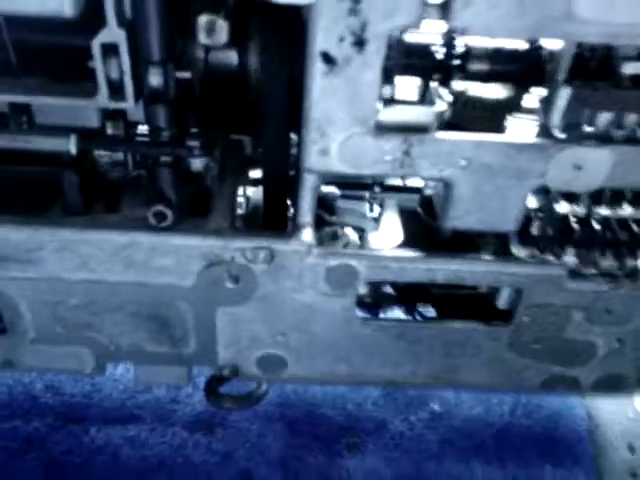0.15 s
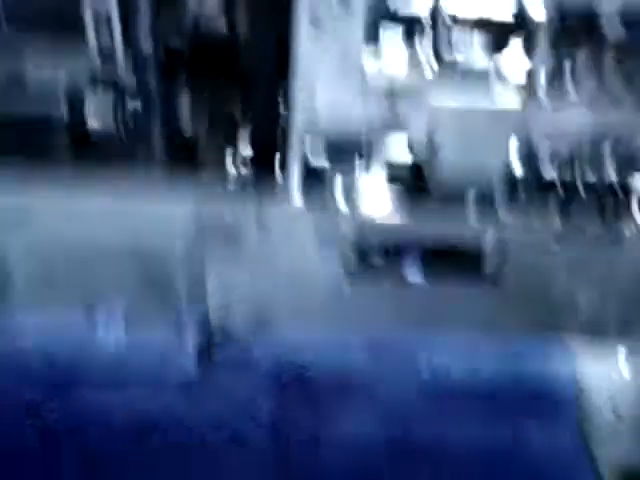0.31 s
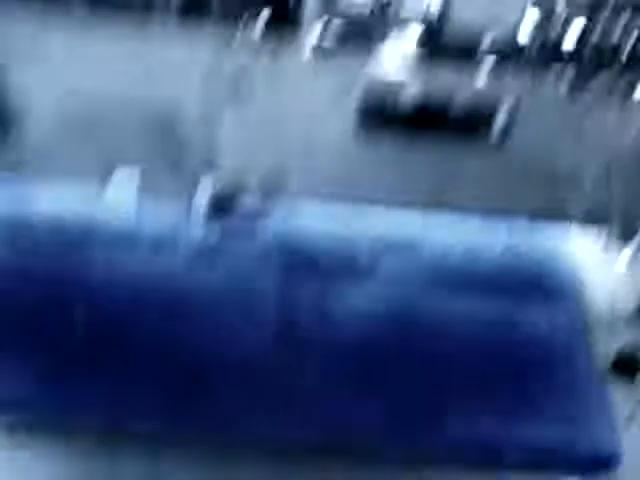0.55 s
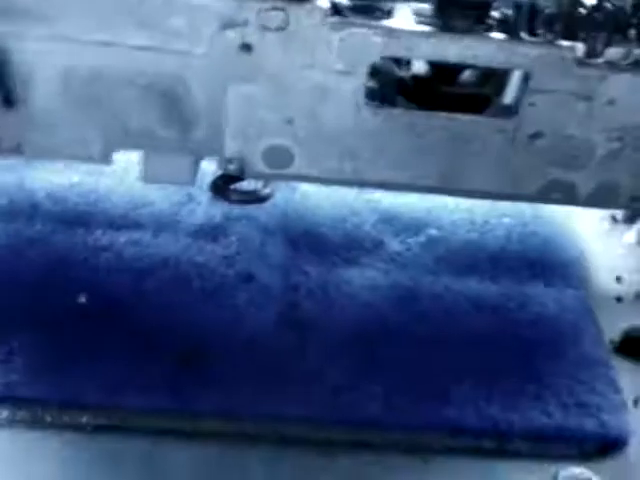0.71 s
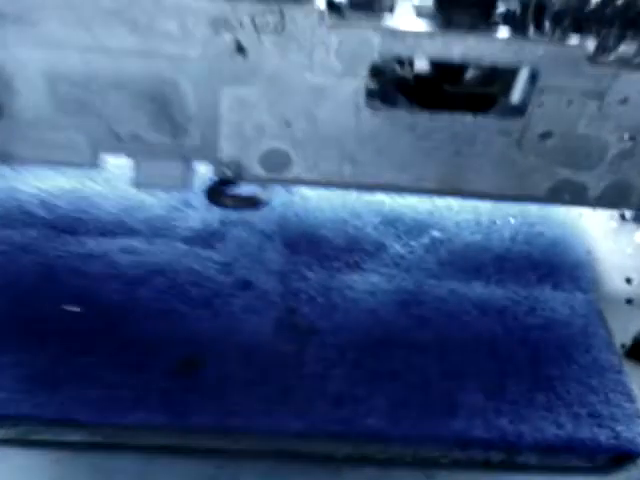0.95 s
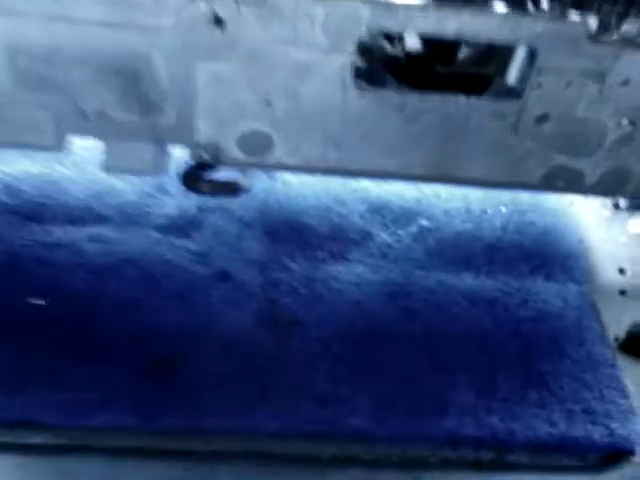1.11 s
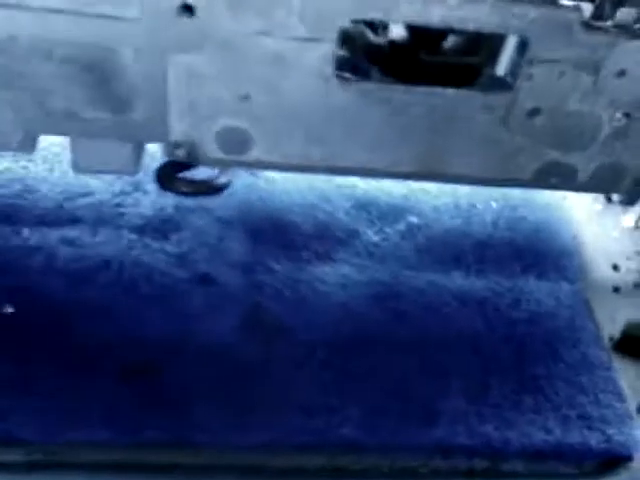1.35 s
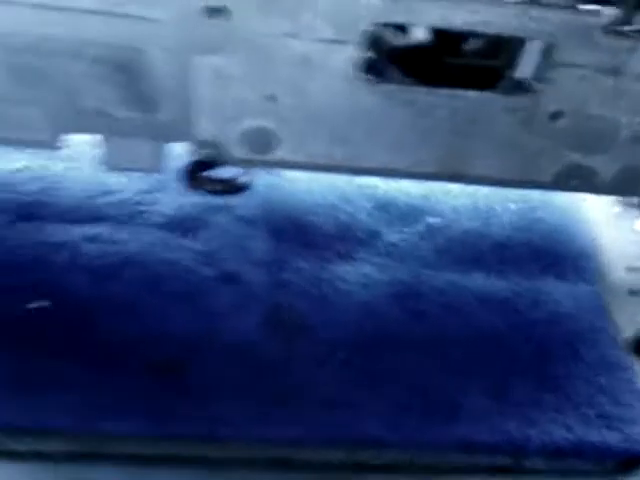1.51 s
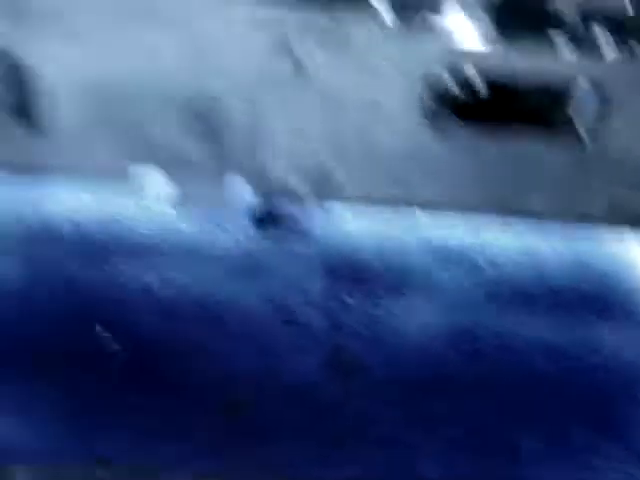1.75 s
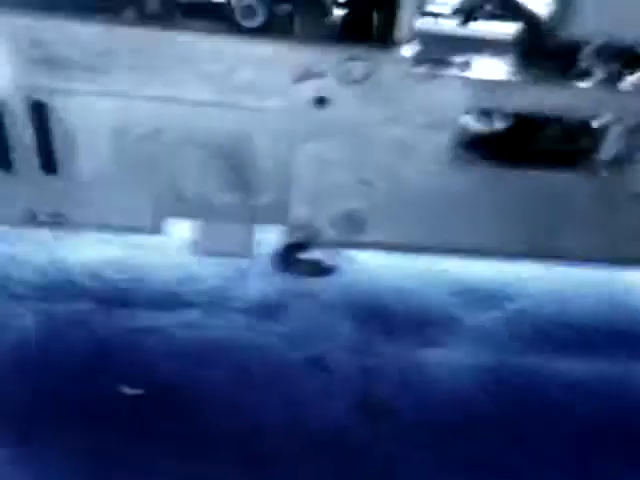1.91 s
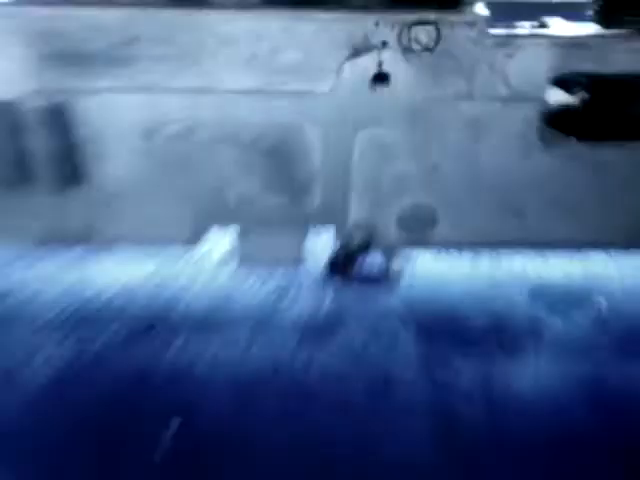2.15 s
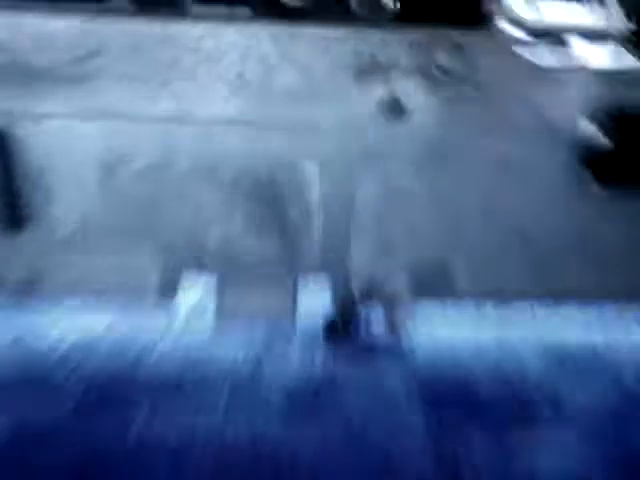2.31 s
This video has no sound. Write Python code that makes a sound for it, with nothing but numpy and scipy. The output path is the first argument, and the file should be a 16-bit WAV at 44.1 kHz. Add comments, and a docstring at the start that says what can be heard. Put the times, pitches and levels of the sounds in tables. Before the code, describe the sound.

Loud double mechanical clack of an open electric typewriter, followed by soft whirring and small ticks

```python
"""An open electric typewriter close by in a small room: its linkage rattles and clacks twice, made of dense random
contacts shaped by the frame. Small parts tick and snap (a ping plus gritty noise) and soft knocks thud (low
damped swings). Behind them the motor hums and whirs (wavering tones, noise in the housing's resonances) in a
rush of air, and a faint rustle of noise swells late. A narrow-band recorder keeps little above 8 kHz."""
import sys
import numpy as np
from scipy import signal
from scipy.fft import rfft, irfft, next_fast_len
from scipy.io import wavfile
from scipy.ndimage import map_coordinates

SR = 44100
rng = np.random.default_rng(int(sys.argv[2]) if len(sys.argv) > 2 else 0)


def digitize_waveform(pressure):
    """Quantize a signal to 16-bit integers and store it at the path in sys.argv[1].

    Rows of a 2-D input are taken as channels; values are limited to [-1, 1].
    """
    field = np.atleast_2d(pressure).T
    bounded = np.clip(field, -1, 1)
    quanta = np.round(bounded * 32767).astype(np.int16)
    wavfile.write(sys.argv[1], SR, quanta)


def magnitude_from_level(level_db):
    """Linear magnitude for a level in decibels (20 dB per decade)."""
    exponent = np.asarray(level_db, float) / 20
    return 10 ** exponent


N = 105354  # length in samples

# Room air and fan, shape of the rush: f/Hz, density/dB per Hz (relative)
AIR_SPECTRUM = [(15, -50), (30, -12.5), (80, -5), (150, -2), (313, -7), (408, -11), (1330, -13.5),
                (3000, -23), (6000, -34.5), (7900, -38.5)]
# Treble of the air; only its distance from the median counts as movement: t/s, level/dB (before AIR_OVER_DB)
AIR_TREBLE = [(0, -76.5), (.55, -82), (1.5, -81.5), (2.05, -82.5), (2.25, -78.5), (2.39, -82.5)]
# Wavering whine tones of the motor: f/Hz, level/dB (rms, before waver and the whir's rise and fall)
WHINE_TONES = [(1093, -76), (1175, -78), (1245, -80), (1287, -84.5), (1523, -82.5)]
# Rise and fall of the motor's whir: t/s, level/dB (before WHIR_OVER_DB)
WHIR_LEVEL = [(0, -70), (.3, -67.5), (.95, -69), (1.2, -67), (1.5, -68.5), (1.9, -71), (2.1, -68.5),
              (2.39, -73)]
# Resonances of the motor housing: f/Hz, width/Hz, level/dB (before squaring)
HOUSING = [(304, 169, 0), (609, 28, -1.5), (806, 120, -3.5), (1244, 176, 0.5), (1980, 330, -3)]
# Resonances of the rustle: f/Hz, width/Hz, level/dB (before squaring)
RUSTLE_BODY = [(517, 160, -2.5), (834, 49, 2), (3440, 330, -5)]
# Swell of the rustle: t/s, level/dB
RUSTLE_SWELL = [(1.95, -94), (2.05, -80), (2.15, -86), (2.27, -75.5), (2.39, -73)]
# Soft knocks through the frame: t/s, level/dB (before THUD_DB), settled pitch f/Hz, time to fall 60 dB t60/s
KNOCKS = [(0.044, -34, 191.6, 0.14), (0.051, -39, 118.4, 0.42), (0.107, -37.5, 298, 0.24),
          (.245, -45, 157.4, 0.15), (0.486, -41, 300, 0.016), (0.746, -48, 316.5, 0.12),
          (1.1, -57.5, 533, 0.28), (1.149, -49, 105, 0.27), (1.246, -38, 148.2, 0.35),
          (1.248, -42.5, 246, 0.16), (1.3356, -28.5, 683, 0.0093), (1.316, -42, 160, 0.11),
          (1.36, -48.5, 199.4, 0.23), (1.397, -48.5, 171.4, .2), (1.445, -57.5, 177, 0.22),
          (1.591, -50, 143.6, 0.21)]
# A small spring set ringing: f/Hz, level/dB (peak), time to fall 60 dB t60/s
SPRING_TONES = [(2150, -58.5, 0.53), (2540, -61, 0.47)]
# Ticks and snaps of small parts, the first row being the ringing first contact of the second clack: t/s,
# level/dB (before TICK_DB), brightest f/Hz, grit's time to fall 60 dB t60/s
SMALL_PARTS = [(0.1084, -22, 1500, .015), (0.209, -51, 3010, 0.16), (0.225, -44.5, 5380, 0.08),
               (0.2364, -36, 5350, 0.051), (0.3368, -53.5, 6790, 0.017), (0.427, -63.5, 4900, 0.065),
               (0.437, -57.5, 2140, 0.035), (0.4525, -58, 6800, .03), (0.462, -47, 4500, 0.055),
               (0.4654, -52, 7300, 0.062), (0.4839, -52, 4000, 0.063), (0.8898, -57.5, 4600, 0.012),
               (1.075, -50.5, 3240, 0.13), (1.081, -38.5, 6620, 0.032), (1.086, -44, 1100, 0.12),
               (1.0868, -45, 3100, 0.027), (1.0905, -41.5, 4200, 0.028), (1.1179, -46.5, 4100, 0.027),
               (1.1604, -61.5, 6340, 0.053), (1.2319, -39.5, 7210, 0.1), (1.2401, -31.5, 4920, 0.026),
               (1.2463, -42.5, 2150, 0.049), (1.287, -48, 7200, 0.018), (1.331, -37, 6800, 0.038),
               (1.3412, -31.5, 5230, 0.012), (1.344, -42, 4730, 0.083), (1.4314, -53.5, 6600, 0.021),
               (1.451, -53.5, 3020, 0.018), (1.5902, -46, 6750, 0.081), (1.5949, -42, 2650, 0.022),
               (1.601, -44.5, 5200, 0.07), (1.841, -62, 4800, 0.038), (1.865, -65, 3930, 0.036),
               (1.987, -67, 5860, 0.025)]
# General colour of the small parts' grit: f/Hz, density/dB per Hz (relative)
PART_SPECTRUM = [(200, -34.5), (500, -1), (909, 0.5), (4040, -3.5), (6010, -8.5), (7080, -3.5),
                 (7900, -26.5)]
# Rattle of the loose linkage: t/s, level/dB
RATTLE_LEVEL = [(0, -38.5), (.04, -34.5), (.075, -49), (.09, -43), (.098, -37), (.14, -51.5), (.16, -61),
                (.2, -64), (.3, -69.5)]
# General colour of the linkage: f/Hz, density/dB per Hz (relative)
LINKAGE_SPECTRUM = [(35, -35), (100, -10), (184, 0.5), (245, -12), (320, -3), (579, -18), (850, -6),
                    (1570, -6), (2010, -12), (5000, -10.5), (6100, -15.5), (6850, -12), (7900, -23.5)]
# Resonances of the frame: f/Hz, width/Hz, level/dB (before RATTLE_RING)
FRAME_BODY = [(312, 47, 0.5), (1490, 300, -7), (2270, 37, 10.5), (2970, 110, 4), (3340, 200, 6)]
# Heavy blows inside the two clacks: t/s, level/dB, time to fall 60 dB t60/s
BLOWS = [(0.0456, -30, 0.068), (0.0472, -27.5, 0.04), (0.052, -32.5, 0.11), (0.1077, -29.5, 0.087),
         (0.1138, -30, 0.062), (0.13, -41, 0.065)]
# Parts of the frame that heavy clacks stress: f/Hz, width/Hz, level/dB
HEAVY_BODY = [(1600, 450, -3.5), (296, 27, -13)]
# How long the room rings: f/Hz, time to fall 60 dB t60/s
ROOM_T60 = [(200, 0.7), (1500, 0.27), (7000, 0.3)]
# The recorder's band: f/Hz, level/dB
BAND_EDGE = [(60, -2), (120, 2), (7200, -1.5), (7600, -5.5), (7950, -32.5), (8000, -62)]
# Its mirror image above 8 kHz: f/Hz, level/dB
MIRROR_IMAGE = [(7950, -101), (8150, -20), (8600, -18), (9200, -55.5), (9700, -90)]

AIR_OVER_DB = 14.5
HUM_HZ, HUM_DB, HUM_WAVER_DB = 121.6, -63.5, 3
HUM_DIP_S, HUM_DIP_DB = 1.494, -10.5  # the hum dips briefly
WHINE_WAVER_DB, WHINE_DRIFT_RAD = 4, 1.1
WHIR_OVER_DB, WHIR_FLUTTER_DB = 2, 1.5  # each resonance flutters on its own
THUD_NOISE, THUD_DB = 0.37, -4  # share of rumble; level trim
THUD_SAG, THUD_SAG_S = 0.35, 0.02  # a knock starts sharp by this share and settles
SPRING_S = 1.243
PART_RING, PART_Q, TICK_DB = 2, 12, -5  # size and sharpness of a part's resonance; level trim
PING_SIZE, PING_CYCLES = 1.3, 19  # ping over grit; cycles to fall 60 dB
BASS_CUT, CLUMP_DB = 5, 3  # little sound below pitch / BASS_CUT; contacts come in uneven clumps
RATTLE_PER_S, RATTLE_RING = 16000, 0.37  # contacts a second; share of frame resonance
CLACK_TREBLE = 0.56  # unresonant share of a heavy clack
ROOM_DB = -13.5
RECORDER_HZ, CEILING = 16000, 0.12  # sample rate; soft clip's greatest height


def unit(x):
    """Scale to rms 1."""
    return x / np.sqrt(np.mean(x ** 2) + 1e-20)


def along(points, hz):
    """Read a table of (f/Hz, value) points on a log frequency axis."""
    f, value = np.transpose(points)
    return np.interp(np.log(hz + 1), np.log(f + 1), value)


def curve(rows):
    """Draw straight lines between (t/s, value) rows, one value per sample."""
    return np.interp(np.arange(N) / SR, *np.transpose(rows))


def wobble(rate):
    """A smooth random curve with rate knots a second."""
    knots = rng.standard_normal(int(N * rate / SR) + 4)
    return map_coordinates(knots, [np.arange(N) * rate / SR])


def filtered(x, response):
    """Multiply the spectrum of x by a complex response of frequency."""
    size = next_fast_len(len(x) + 4096)
    spectrum = rfft(x, size) * response(np.fft.rfftfreq(size, 1 / SR))
    return irfft(spectrum, size)[:len(x)]


def resonances(table):
    """Response of (f/Hz, width/Hz, level/dB) resonances, ringing only after they are struck."""
    def response(f):
        total = 0
        for k, (center, width, db) in enumerate(table):
            peak = 1j * f * width / (center * center - f * f + 1j * f * width)
            total = total + (-1) ** k * magnitude_from_level(db) * peak  # alternate signs
        return total
    return response


def add(track, s, sound):
    """Mix a sound in at time s, in seconds."""
    part = track[round(s * SR):][:len(sound)]
    part += sound[:len(part)]


def room(x):
    """The room answers with fading noise; each frequency dies at its own speed."""
    hz, t, noise = signal.stft(rng.standard_normal(SR // 2), SR, nperseg=256)
    fade = magnitude_from_level(-60 * t / along(ROOM_T60, hz)[:, None])
    tail = signal.istft(noise * fade, SR, nperseg=256)[1]
    delayed = np.pad(x, (200, 0))  # samples of delay
    return signal.fftconvolve(delayed, tail / np.linalg.norm(tail))[:N]


def air():
    """Broad rush of noise whose treble follows the moving microphone."""
    rush = unit(filtered(rng.standard_normal(N), lambda f: magnitude_from_level(along(AIR_SPECTRUM, f))))
    low = filtered(rush, lambda f: 1 / (1 + (f / 1500) ** 2))
    treble_db = curve(AIR_TREBLE)
    rest_db = np.median(treble_db)
    treble = (rush - low) * magnitude_from_level(treble_db - rest_db)
    return magnitude_from_level(rest_db + AIR_OVER_DB + wobble(13)) * (low + treble)


def motor():
    """Mains hum, unsteady whine tones and a whir of noise in the housing's resonances."""
    t = np.arange(N) / SR
    turn = 2 * np.pi * t
    dip_db = HUM_DIP_DB * np.exp(-((t - HUM_DIP_S) / .04) ** 2)
    hum_level = magnitude_from_level(HUM_DB + dip_db + HUM_WAVER_DB * wobble(9.1))
    hum = hum_level * np.sin(HUM_HZ * turn + 0.088 * wobble(8.5))
    level_db = curve(WHIR_LEVEL)
    whine = np.zeros(N)
    for hz, db in WHINE_TONES:
        tone_level = magnitude_from_level(db + WHINE_WAVER_DB * wobble(19))
        whine += tone_level * np.sin(hz * turn + WHINE_DRIFT_RAD * wobble(13))
    whine *= magnitude_from_level(level_db - np.median(level_db))
    whir = np.zeros(N)
    for mode in HOUSING:
        ring = resonances([mode])
        band = filtered(rng.standard_normal(N), lambda f: ring(f) ** 2)
        whir += band * magnitude_from_level(WHIR_FLUTTER_DB * wobble(22))
    whir = unit(whir) * magnitude_from_level(level_db + WHIR_OVER_DB)
    return np.sqrt(2) * (hum + whine) + whir  # root 2 turns a sine's rms into its peak


def rustle():
    """Noise in a few resonances, nearly silent until late."""
    body = resonances(RUSTLE_BODY)
    level = magnitude_from_level(curve(RUSTLE_SWELL) + 2.8 * wobble(15))
    return level * unit(filtered(rng.standard_normal(N), lambda f: body(f) ** 2))


def thuds():
    """Soft knocks: a low damped swing, its pitch settling, with some rumble around it."""
    out, t = np.zeros(N), np.arange(SR // 3) / SR
    for s, db, hz, t60 in KNOCKS:
        around = resonances([(hz * 1.48, hz * 2.0, 0)])
        shape = lambda f: around(f) ** 2 / (1 + (f / (4 * hz)) ** 2)
        rumble = unit(filtered(rng.standard_normal(len(t)), shape))
        bent_time = t + THUD_SAG * THUD_SAG_S * (1 - np.exp(-t / THUD_SAG_S))
        swing = np.sin(2 * np.pi * hz * bent_time) + THUD_NOISE * rumble
        soft_start = 1 - np.exp(-t * hz / 0.35)
        add(out, s, magnitude_from_level(db + THUD_DB - 60 * t / max(t60, .005)) * swing * soft_start)
    return out


def spring():
    """A faint metallic ring of two dying tones after a hard snap."""
    t = np.clip(np.arange(N) / SR - SPRING_S, 0, None)
    return sum(magnitude_from_level(db - 60 * t / t60) * np.sin(2 * np.pi * hz * t) for hz, db, t60 in SPRING_TONES)


def ticks():
    """Each small part, or the second clack's first contact, gives a short ping and a burst of gritty noise
    coloured by a resonance at the same pitch."""
    out, t = np.zeros(N), np.arange(SR // 5) / SR
    clumps_db = CLUMP_DB * wobble(250)
    for s, db, hz, t60 in SMALL_PARTS:
        ring = resonances([(hz, hz / PART_Q, 0)])
        bass_cut = lambda f: f / np.hypot(f, hz / BASS_CUT)
        colour = lambda f: magnitude_from_level(along(PART_SPECTRUM, f)) * (1 + PART_RING * ring(f)) * bass_cut(f)
        grit = unit(filtered(rng.standard_normal(len(t)), colour))
        fade_db = -60 * t / max(t60, .003)
        burst = magnitude_from_level(fade_db + clumps_db[round(s * SR):][:len(t)]) * grit
        ping = PING_SIZE * magnitude_from_level(-60 * t * hz / PING_CYCLES) * np.sin(2 * np.pi * hz * t)
        add(out, s, magnitude_from_level(db + TICK_DB) * (burst + ping))
    return out


def linkage():
    """Dense uneven contacts ring the frame; they jump in strength and deepen at each clack."""
    t = np.arange(N) / SR
    blows = sum(magnitude_from_level(db - 60 * np.abs(t - s) / t60) * (t >= s) for s, db, t60 in BLOWS)
    hits = (rng.random((2, N)) < RATTLE_PER_S / SR) * rng.standard_normal((2, N))
    frame, body = resonances(FRAME_BODY), resonances(HEAVY_BODY)
    light = lambda f: magnitude_from_level(along(LINKAGE_SPECTRUM, f)) * (1 + RATTLE_RING * np.abs(frame(f)))
    heavy = lambda f: light(f) * (CLACK_TREBLE + np.abs(body(f)))
    rattle_level = magnitude_from_level(curve(RATTLE_LEVEL)) * (t < RATTLE_LEVEL[-1][0])  # silent after the last row
    # dividing by the steady contacts' strength makes the tables' levels hold
    rattle = filtered(rattle_level * hits[0], light) / np.std(filtered(hits[0], light))
    clacks = filtered(blows * hits[1], heavy) / np.std(filtered(hits[1], heavy))
    return rattle + clacks


def scene():
    """Struck parts with the room's answer, over knocks, motor, air and rustle."""
    struck = linkage() + ticks() + spring()
    mix = struck + thuds() + magnitude_from_level(ROOM_DB) * room(struck) + motor() + air() + rustle()
    return mix[None]


def low_pass(x):
    """Removes everything above the highest recorded frequency."""
    return signal.sosfilt(signal.butter(12, 8820, fs=SR, output="sos"), x)


def record(dry):
    """A 16 kHz recorder raised to a higher rate: a soft clip, a band edge and a faint mirror image above it."""
    clipped = dry[0] / np.sqrt(np.sqrt(1 + (dry[0] / CEILING) ** 4))
    band = filtered(clipped, lambda f: f < RECORDER_HZ / 2)
    mirror = 2 * band * np.cos(2 * np.pi * RECORDER_HZ * np.arange(N) / SR)
    kept = filtered(band, lambda f: magnitude_from_level(along(BAND_EDGE, f)))
    image = filtered(mirror, lambda f: magnitude_from_level(along(MIRROR_IMAGE, f)))
    mix = kept + image
    return low_pass(mix[None])


dry = scene()
out = record(dry)
digitize_waveform(out)
```